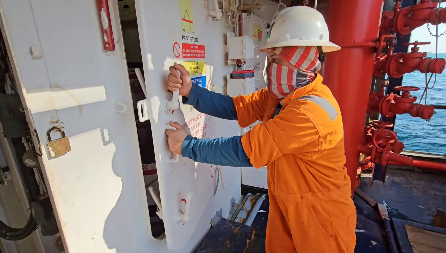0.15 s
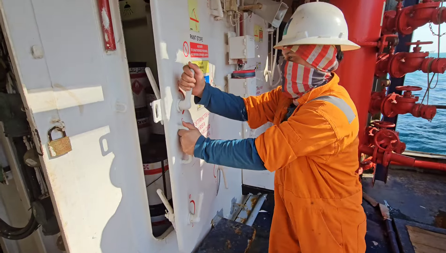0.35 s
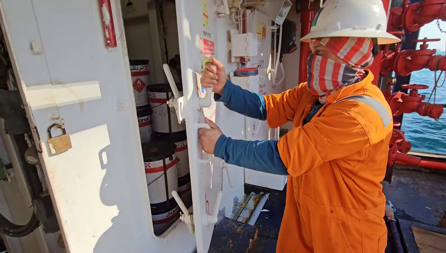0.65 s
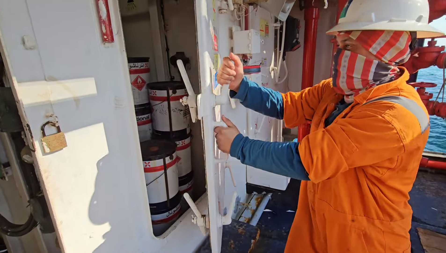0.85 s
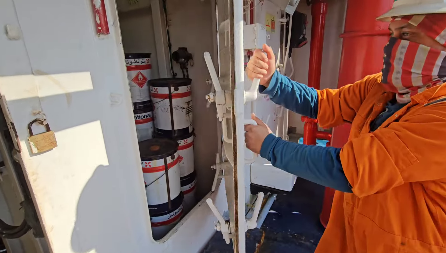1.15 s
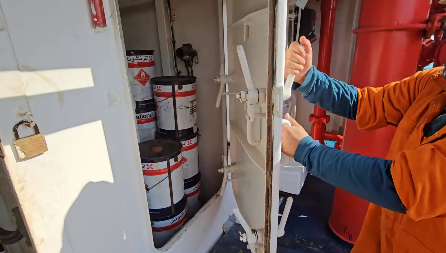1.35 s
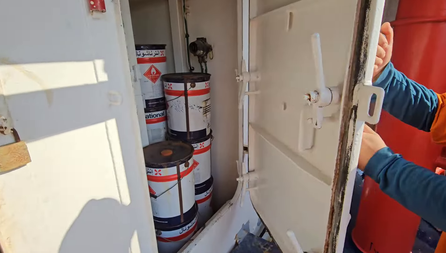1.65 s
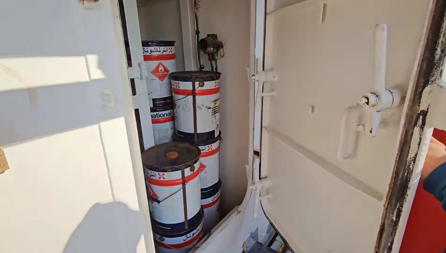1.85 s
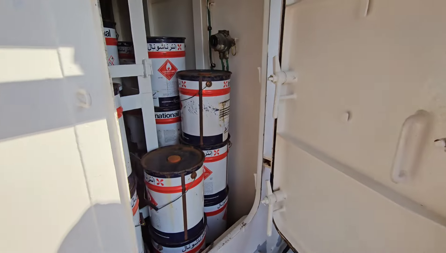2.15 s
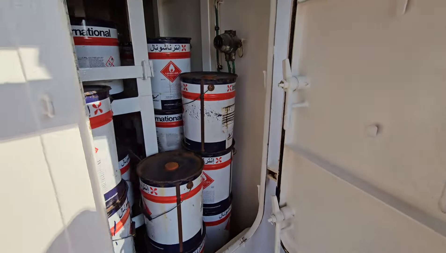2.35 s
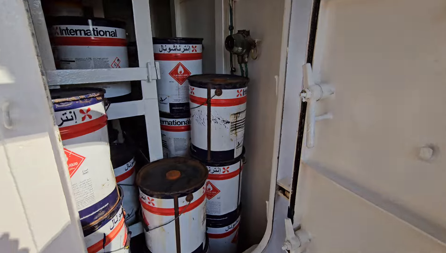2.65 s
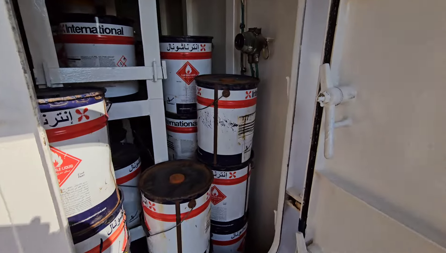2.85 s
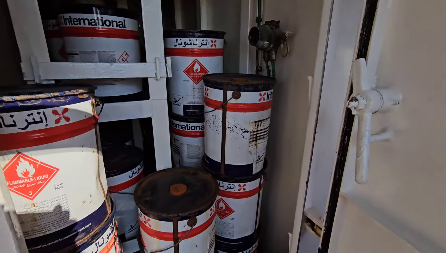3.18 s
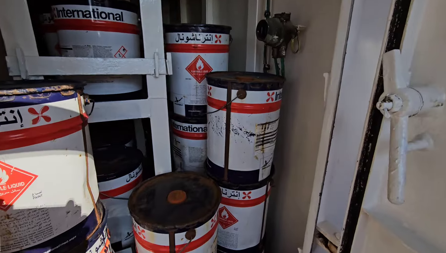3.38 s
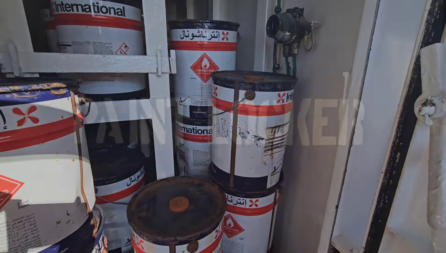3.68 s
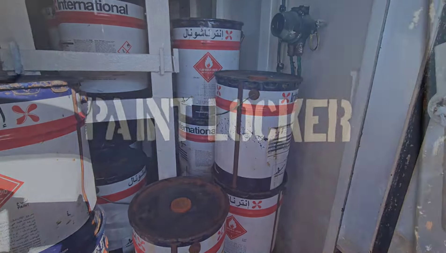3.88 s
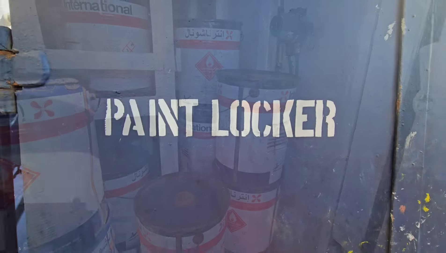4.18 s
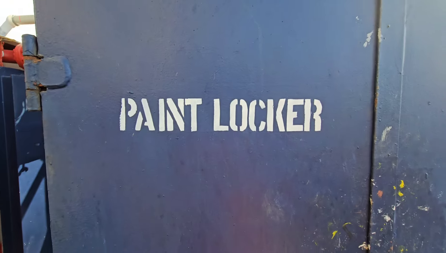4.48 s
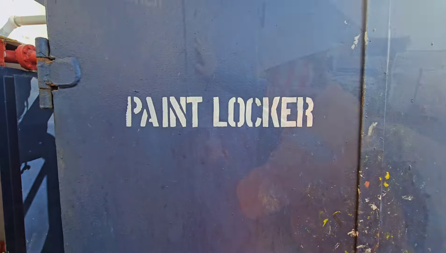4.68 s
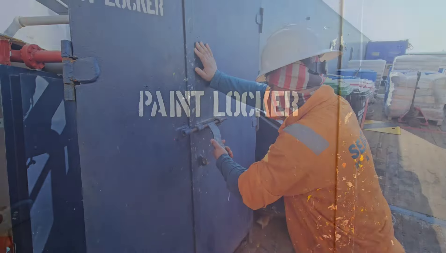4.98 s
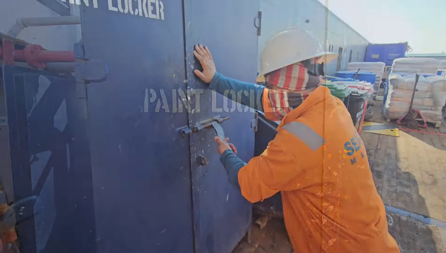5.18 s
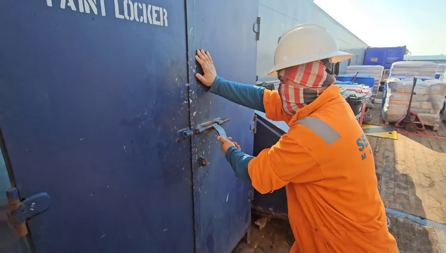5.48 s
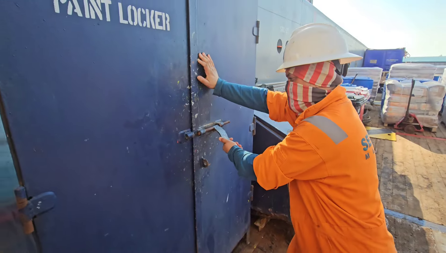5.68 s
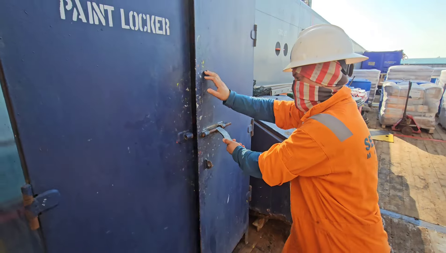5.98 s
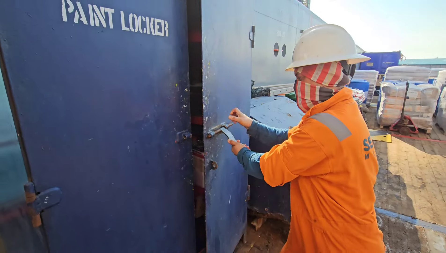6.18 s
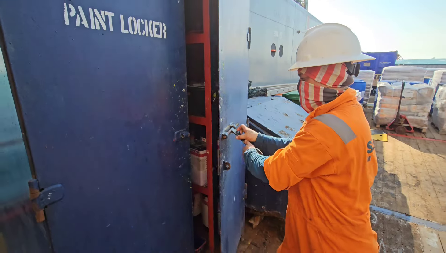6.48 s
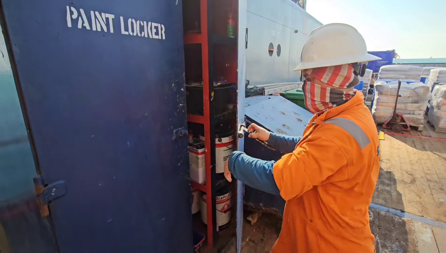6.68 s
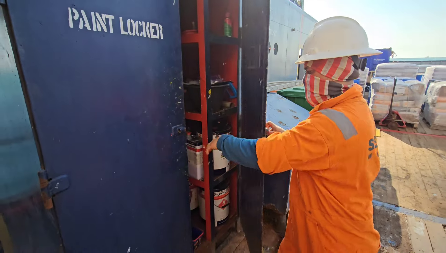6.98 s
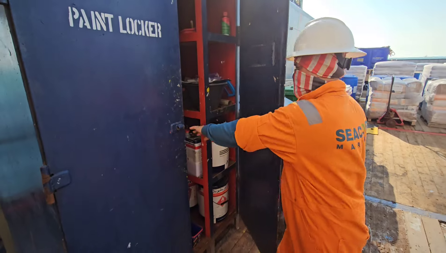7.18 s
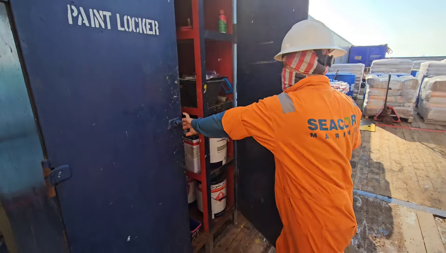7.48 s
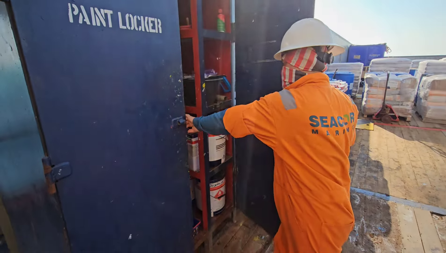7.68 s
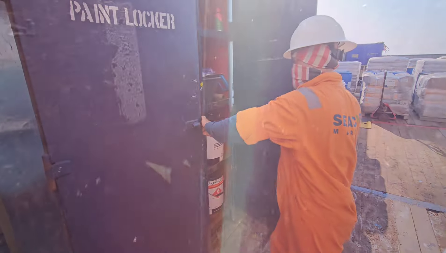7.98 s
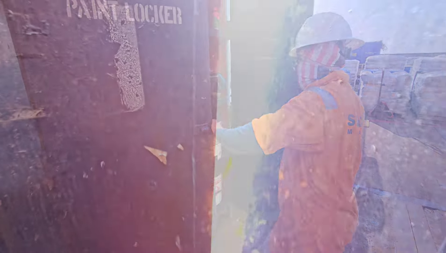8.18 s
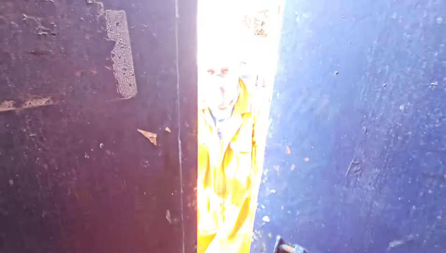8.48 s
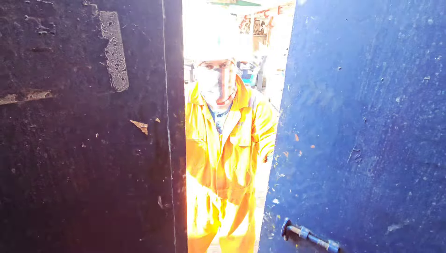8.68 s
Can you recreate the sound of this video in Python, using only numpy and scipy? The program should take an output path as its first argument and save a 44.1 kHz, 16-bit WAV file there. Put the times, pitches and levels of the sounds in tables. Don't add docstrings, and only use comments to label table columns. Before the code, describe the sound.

A constant dark engine rumble pulses and swells, with humming plating and soft airy hiss around it. First comes a hollow boom from a steel door, later a small bright latch rattle with a dry tick, then a sharp ringing bolt. A faint gust of spray rises around the bolt. The handheld stereo microphone is heard in four blending deck positions, ending in a deeper, duller locker.

```python
import sys
import numpy as np
from scipy import signal
from scipy.fft import rfft, irfft
from scipy.io import wavfile

SR = 44100
rng = np.random.default_rng(int(sys.argv[2]) if len(sys.argv) > 2 else 0)


def dump_mix(stems):
    frames = np.atleast_2d(stems).T
    limited = np.clip(frames, -1, 1)
    pcm = np.round(limited * 32767).astype(np.int16)
    wavfile.write(sys.argv[1], SR, pcm)


def voltage_ratio(decibels):
    exponent = np.asarray(decibels, float) / 20
    return 10 ** exponent


N = 389844

# (start [s], end [s])
BLENDS = [
    (3.7, 4.28),
    (4.7, 5.26),
    (7.9, 8.45),
]
# (time [s], level [dB])
ROAR_LEVEL = [(0.0, -32), (0.54, -32.5), (1.21, -36), (1.9, -34), (2.78, -34.5), (3.08, -38.5), (3.59, -38),
              (3.86, -37.5), (4.48, -29), (4.58, -28.5), (5.02, -35.5), (5.74, -32), (7.66, -32),
              (8.22, -39.5), (8.84, -35.5)]
# (rumble [dB], drone [dB], machinery [dB], hiss [dB])
PLACE_MIX_DB = [
    (5.5, 11, 1.5, -16),
    (9.5, 11, 4.5, -12),
    (7, 10.5, 4, -13),
    (7.5, 10, -0.5, -15),
]
LAYER_EDGES_HZ = [160, 700, 3000]
FOLLOWS, USUAL_DB = [0.38, 0.73, 0.79, 0.59], -31.5

# (frequency [Hz], density [dB per Hz])
SIDE_DECK_COLOUR = [(42, -29), (72, 2.5), (92, -5), (212, -12), (265, -14.5), (324, -15), (406, -24),
                    (454, -21), (813, -30), (910, -25), (1190, -32.5), (1950, -33.5), (2440, -41),
                    (15400, -52.5)]
BLANK_DOOR_COLOUR = [(42, -30), (72, 4), (86, -2.5), (151, -7.5), (207, -6), (253, -11), (324, -12),
                     (388, -21), (454, -15.5), (795, -25), (2180, -32.5), (3130, -41.5), (7340, -42.5),
                     (15400, -53.5)]
AFT_DECK_COLOUR = [(42, -30), (72, -19), (86, -9.5), (129, -4.5), (158, -12), (231, -4.5), (324, -8.5),
                   (406, -16.5), (568, -16.5), (727, -27), (2180, -37), (2860, -46), (11800, -54.5),
                   (15400, -63)]
LOCKER_COLOUR = [(42, -32), (72, 8), (101, -14), (158, -3.5), (247, -16.5), (283, -12), (324, -19),
                 (434, -16.5), (727, -32.5), (870, -29.5), (1360, -27), (1830, -35), (3270, -45.5),
                 (15400, -71)]
# (frequency [Hz], density [dB per Hz])
DEEP_COLOUR = [(10, -39), (25, 2.5), (48, -2)]
DEEP_LIFT_DB = [-0.5, -3, -11, 10]
# (frequency [Hz], width [Hz], lift [dB])
SIDE_DECK_PEAKS = [(211, 30, 0), (325, 7.3, 3.5), (480, 21, 0.5), (638.7, 16, 8.5), (888, 8.9, 4.5),
                   (977, 34, 1.5), (1280, 130, 6)]
BLANK_DOOR_PEAKS = [(245, 28, 3), (332, 17, 6.3), (460, 41, 3), (618, 36, 3.1), (1930, 400, 0.96)]
AFT_DECK_PEAKS = [(210, 8.9, 3.4), (227.3, 9.6, 7.3), (237, 16, 3.9), (270, 19, 3.4), (322.5, 11, 7.2),
                  (381, 20, 6.4), (626, 4.7, 2.9), (909, 22, 3.5)]
LOCKER_PEAKS = [(30, 15, 7), (48.7, 8, 23), (84.4, 6.2, -4.5), (104.9, 20, -11), (287.5, 30, 3.5),
                (530.6, 90, 4), (903, 77, 7.5)]
# (frequency [Hz], width [Hz], lift [dB])
PORT_PEAKS = [(2150, 280, 0), (4370, 1100, 3), (7360, 520, 2), (10500, 1700, -4), (11500, 640, 3)]
# (frequency [Hz], correlation [-1..1])
LIKENESS = [(60, .992), (130, .985), (250, .93), (420, .8), (700, .48), (950, -.05), (1300, -.25),
            (1800, .12), (2600, .1), (4000, .0)]
# (frequency [Hz], left minus right [dB])
LEAN = [(60, 0.5), (500, 0.2), (1000, 1), (1500, 3), (2400, 0), (4000, -5), (8000, -3), (12000, -0.5)]

FIRING_HZ = [62.34, 62.7, 61.6, 63.84]
# (multiple of engine cycle [-], level [dB])
ORDERS = [(7, -35), (8, -48), (10, -30), (12, -32), (13, -31), (15, -33.5), (16, -37)]
# (top [s], rise [s], fall [s], level [dB])
FIRING_THROBS = [(0.62, 0.44, 0.64, -14), (1.35, .4, .25, -19), (1.72, 0.094, 0.074, -22),
                 (2.2, 0.5, .55, -17), (3.15, 0.32, 0.21, -18.5), (3.47, 0.2, 0.63, -19),
                 (4.65, 0.39, 0.39, -16), (5.55, 0.58, .4, -17.5), (6.06, 0.091, .08, -21),
                 (6.4, 0.27, 0.45, -15), (7.0, 0.24, .1, -21.5), (7.42, 0.28, 0.56, -17.5),
                 (8.05, 0.14, 0.51, -22), (8.74, 0.22, .1, -26)]
# (top [s], rise [s], fall [s], level [dB])
OCTAVE_THROBS = [(1.5, .15, 0.25, -34), (2.36, 0.29, 0.57, -32), (4.55, 0.69, 0.19, -27),
                 (5.83, .12, .7, -27.5), (7.14, 0.084, 0.13, -26), (7.5, 0.16, 0.55, -23.5),
                 (8.17, .15, 0.17, -22)]
# (middle [s], half length [s], frequency [Hz], level [dB])
SWELLS = [(1.255, 0.65, 325, -29), (3.35, 0.34, 70.9, -20), (4.198, 0.51, 245, -25.5),
          (4.713, 0.31, 332, -24.5), (4.65, 0.19, 465, -30), (5.701, 0.72, 240.2, -27),
          (6.198, 0.49, 203.6, -23.5), (6.887, 1, 228.5, -28.5), (7.71, 0.78, 318.4, -29)]

# (time [s], contact [dB], t60 [s])
BUMP_TOUCHES = [
    (2.822, -23, 0.4),
    (2.847, -15, 0.18),
    (2.862, -16.5, 0.08),
    (2.888, -23, 0.07),
]
# (frequency [Hz], width [Hz], level [dB])
BUMP_PEAKS = [(464, 74, -2.5), (640, 30, -6.5), (960, 69, -22), (1390, 180, -5.5), (1900, 63, -10),
              (3120, 140, -30), (4150, 690, -20), (5230, 320, -25), (7400, 1000, -24)]
# (frequency [Hz], density [dB])
BUMP_COLOUR = [(150, -4), (400, -4), (900, -4), (2000, -13), (5000, -25), (7000, -37), (10000, -40),
               (15000, -63)]
# (time [s], contact [dB], t60 [s])
LATCH_TOUCHES = [
    (5.242, -27, .12),
    (5.256, -29, .08),
    (5.266, -32, .04),
    (5.282, -35, 0.2),
]
# (frequency [Hz], width [Hz], level [dB])
LATCH_PEAKS = [(1342, 100, 0), (1780, 100, 6), (2580, 60, -1), (3050, 37, -2), (3460, 52, -7),
               (4400, 200, -13)]
# (frequency [Hz], density [dB])
LATCH_COLOUR = [(500, -30), (1200, -4), (2200, -9), (5000, -22), (9000, -32), (12000, -54)]
# (time [s], contact [dB], t60 [s])
BOLT_TOUCHES = [
    (7.429, -18.5, 0.04),
    (7.432, -22, .24),
    (7.453, -28.5, .15),
]
# (frequency [Hz], width [Hz], level [dB])
BOLT_PEAKS = [(1300, 40, -2), (2090, 60, -12), (2950, 55, -6), (3230, 74, -4), (3680, 120, -2),
              (5200, 81, -9), (5500, 200, -17), (6960, 250, -12), (7800, 120, -15), (10400, 310, -20),
              (11700, 200, -22)]
# (frequency [Hz], density [dB])
BOLT_COLOUR = [(500, -32), (1200, -2), (2000, 5), (3800, -8), (7000, -10), (12000, -24), (15000, -30)]
# (time [s], peak [dB])
TICKS = [
    (5.469, -16.5),
    (7.4309, -30),
    (8.515, -44),
]
# (time [s], peak [dB], frequency [Hz], t60 [s])
BOOMS = [
    (2.824, -17, 480, 0.027),
    (2.848, -7, 115, .12),
    (2.868, -6.5, 281.5, 0.16),
    (5.242, -35, 4400, 0.045),
    (5.244, -21, 2180, .06),
    (5.254, -21.5, 2180, 0.1),
    (5.279, -27, 2140, .05),
    (7.431, -17.5, 1824, 0.14),
    (7.452, -24.5, 2587, 0.22),
]


def rms_one(x):
    return x / np.sqrt(np.mean(x ** 2) + 1e-20)


def in_time(rows):
    time_s, *columns = np.transpose(rows)
    return [np.interp(np.arange(N) / SR, time_s, column) for column in columns]


def bins(size):
    return np.fft.rfftfreq(size, 1 / SR)


def at_hz(points, size):
    hz, value = np.transpose(points)
    return np.interp(np.log(bins(size) + 1), np.log(hz), value)


def lifts(peaks, size):
    return sum(db / (1 + (2 * (bins(size) - hz) / width_hz) ** 2) for hz, width_hz, db in peaks)


def drift(rate_hz):
    pole = np.exp(-80 * np.pi * rate_hz / SR)
    noise = rng.standard_normal(N // 40 + 4002)
    slow = signal.lfilter([1], [1, -2 * pole, pole * pole], noise)[4000:]
    return np.interp(np.arange(N) / 40, np.arange(len(slow)), rms_one(slow - slow.mean()))


def shares():
    t = np.arange(N) / SR
    gone = [np.ones(N)] + [np.interp(t, blend, [0, 1]) for blend in BLENDS] + [np.zeros(N)]
    return [np.sqrt(np.maximum(a - b, 0)) for a, b in zip(gone, gone[1:])]


def by_place(values):
    return np.transpose(values) @ np.array(shares()) ** 2


def throbs(rows):
    t, out = np.arange(N) / SR, np.zeros(N)
    for top_s, rise_s, fall_s, db in rows:
        near = (t > top_s - rise_s) & (t < top_s + fall_s)
        since = t[near] - top_s
        out[near] += voltage_ratio(db) * np.cos(np.pi / 2 * since / np.where(since < 0, rise_s, fall_s))
    return out


def diffuse(size):
    mid, side = rfft(rng.standard_normal((2, size)))
    alike = np.clip(at_hz(LIKENESS, size), -1, 1)
    pair = np.sqrt(1 + alike) * mid + np.sqrt(1 - alike) * side * [[1], [-1]]
    left_lag_rad = 0.12
    pair[0] *= np.exp(-1j * left_lag_rad)
    return pair * voltage_ratio(at_hz(LEAN, size) / 2 * [[1], [-1]])


def roar():
    size = 5 * SR
    crossovers = [1 / (1 + (edge / (bins(size) + 1)) ** 8) for edge in LAYER_EDGES_HZ]
    above = [1] + crossovers + [0]
    layers = np.zeros((4, 2, N))
    wrap = np.arange(N) % size
    places = [(SIDE_DECK_COLOUR, SIDE_DECK_PEAKS), (BLANK_DOOR_COLOUR, BLANK_DOOR_PEAKS),
              (AFT_DECK_COLOUR, AFT_DECK_PEAKS), (LOCKER_COLOUR, LOCKER_PEAKS)]
    for (colour, peaks), lift_db, share in zip(places, DEEP_LIFT_DB, shares()):
        deep = [(hz, db + lift_db) for hz, db in DEEP_COLOUR]
        colour_db = at_hz(deep + colour[1:], size)
        noise = diffuse(size) * voltage_ratio(colour_db + lifts(peaks + PORT_PEAKS, size))
        heard = share > 0
        for k in range(4):
            layer = rms_one(irfft(noise * np.sqrt(above[k] - above[k + 1])))
            layers[k][:, heard] += share[heard] * layer[:, wrap[heard]]
    swing_db = in_time(ROAR_LEVEL)[0] - USUAL_DB
    levels_db = USUAL_DB + by_place(PLACE_MIX_DB) + np.outer(FOLLOWS, swing_db)
    levels_db[0] -= drift(0.86)
    together = drift(9.7)
    return sum(layer * voltage_ratio(db + 0.34 * together + 0.094 * drift(32))
               for layer, db in zip(layers, levels_db))


def spray():
    band = signal.butter(1, [3200, 13500], "band", fs=SR, output="sos")
    hiss = signal.sosfilt(band, rng.standard_normal((2, N)))
    top_s, rise_s, fall_s, level_db = 7, 1, 0.84, -47
    return rms_one(hiss) * throbs([(top_s, rise_s, fall_s, level_db)])


def swells():
    t = np.arange(N) / SR
    waver_rad = 1.84 * drift(3.17)
    out = np.zeros(N)
    for middle_s, half_s, hz, db in SWELLS:
        near = np.abs(t - middle_s) < half_s
        arch = np.cos(np.pi / 2 * (t[near] - middle_s) / half_s) ** 2
        out[near] += voltage_ratio(db) * arch * np.sin(2 * np.pi * hz * t[near] + waver_rad[near])
    return np.sqrt(2) * out


def engines():
    t = np.arange(N) / SR
    cycle_hz, octave_hz = 6.9, 123.8
    out_of_step_db, octave_rest_db = -43, -42
    firing_rad = 2 * np.pi * np.cumsum(by_place(FIRING_HZ)) / SR + 0.25 * drift(1.7)
    out = (voltage_ratio(out_of_step_db) + throbs(FIRING_THROBS)) * np.sin(firing_rad)
    octave_rad = 2 * np.pi * octave_hz * t + 0.91 * drift(3.8)
    out += (voltage_ratio(octave_rest_db) + throbs(OCTAVE_THROBS)) * np.sin(octave_rad)
    for order, db in ORDERS:
        gain = voltage_ratio(db + 2.2 * drift(0.54))
        out += gain * np.sin(2 * np.pi * order * cycle_hz * t + 1.25 * drift(0.94) + order)
    late = np.pad(out, (14, 0), "edge")[:N]
    return np.sqrt(2) * np.array([late, out]) * voltage_ratio([[0.15], [-0.15]])


def touches(rows):
    t = np.arange(N) / SR
    attack_s = 0.00068
    out = np.zeros(N)
    for start_s, db, t60_s in rows:
        since = np.maximum(t - start_s, 0)
        out += voltage_ratio(db - 60 * since / t60_s) * (1 - np.exp(-since / attack_s))
    return out


def contact(strength, peaks, colour, clicks_per_s, ring_db, pan_db):
    first, size = int(strength[0][0] * SR), 8192
    clicks = rng.standard_normal((2, size)) * (0.13 + (rng.random(size) < clicks_per_s / SR))
    clicks = clicks[0] + 0.35 * clicks[1] * [[1], [-1]]
    soft = signal.lfilter([1, 0, -1], [1, -0.6], clicks)
    rings = 0
    for k, (hz, width_hz, db) in enumerate(peaks):
        r = np.exp(-np.pi * width_hz / SR)
        poles = [1, -2 * r * np.cos(2 * np.pi * hz / SR), r * r]
        rings = rings + (-1) ** k * voltage_ratio(db) * rms_one(signal.lfilter([1], poles, soft))
    crash = irfft(diffuse(size) * voltage_ratio(at_hz(colour, size)))
    out = np.zeros((2, N))
    out[:, first:first + size] = rms_one(voltage_ratio(ring_db) * rms_one(rings) + rms_one(crash))
    return out * touches(strength) * voltage_ratio(pan_db / 2 * np.array([[1], [-1]]))


def ticks():
    out = np.zeros(N)
    pull = np.linspace(0, 1, 60) ** 3
    release = np.exp(-np.arange(160) / 30.0)
    shape = np.convolve(np.concatenate([-pull, release]), [0.8, 0.2])
    for time_s, db in TICKS:
        at = round(time_s * SR) - len(pull)
        out[at:at + len(shape)] += voltage_ratio(db) * shape
    return out


def booms():
    out = np.zeros(N)
    t = np.arange(SR // 2) / SR
    onset = 1 - np.exp(-t / 0.0011)
    for time_s, db, hz, t60_s in BOOMS:
        at = round(time_s * SR)
        out[at:at + len(t)] += voltage_ratio(db - 60 * t / t60_s) * onset * np.sin(2 * np.pi * hz * t)
    return out


def doors():
    out = contact(BUMP_TOUCHES, BUMP_PEAKS, BUMP_COLOUR, clicks_per_s=6000, ring_db=-2.5, pan_db=1.0)
    out += contact(LATCH_TOUCHES, LATCH_PEAKS, LATCH_COLOUR, clicks_per_s=6400, ring_db=-3.5, pan_db=6.0)
    out += contact(BOLT_TOUCHES, BOLT_PEAKS, BOLT_COLOUR, clicks_per_s=6000, ring_db=-2.5, pan_db=0.5)
    return out + booms() + ticks()


def scene():
    return roar() + spray() + swells() + engines() + doors()


def low_pass(x):
    return signal.sosfilt(signal.butter(12, 15520, fs=SR, output="sos"), x)


def record(dry):
    dry = dry * np.minimum(np.arange(N)[::-1] / 200, 1)
    rounded = 1.415 * np.tanh(dry / 1.383)
    top_cut = signal.ellip(6, 0.5, 30, 15550, fs=SR, output="sos")
    mix = signal.sosfilt(top_cut, rounded)
    return low_pass(mix)


dry = scene()
out = record(dry)
dump_mix(out)
```